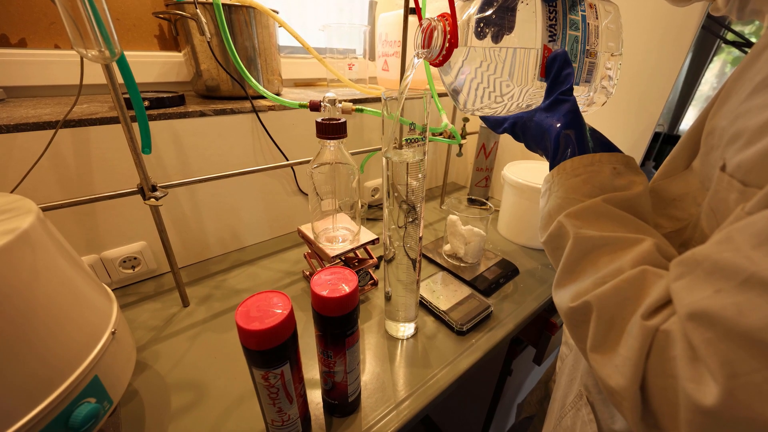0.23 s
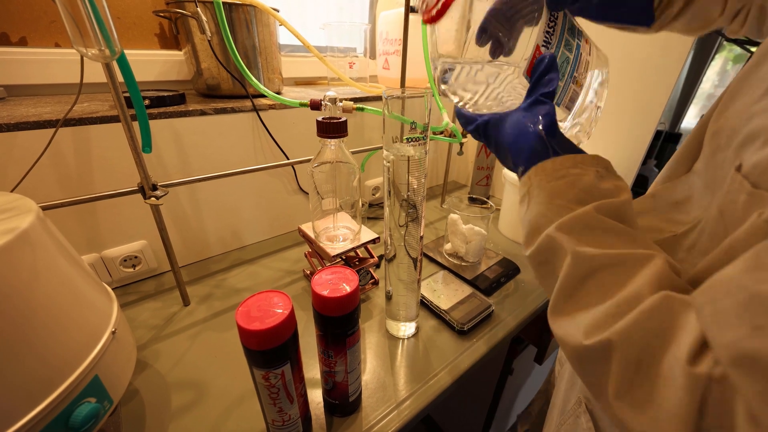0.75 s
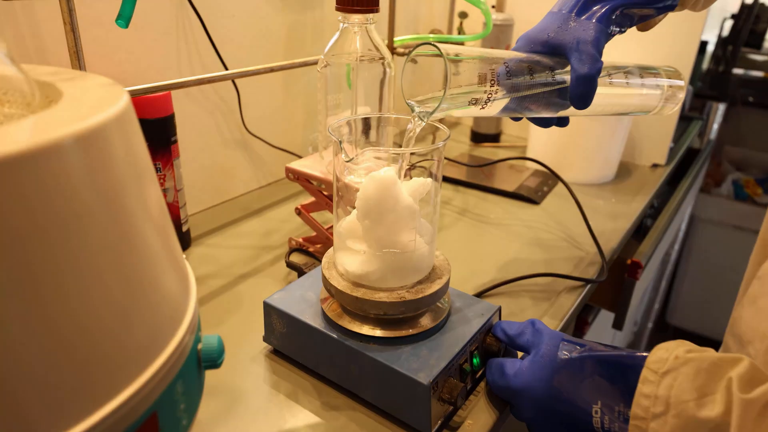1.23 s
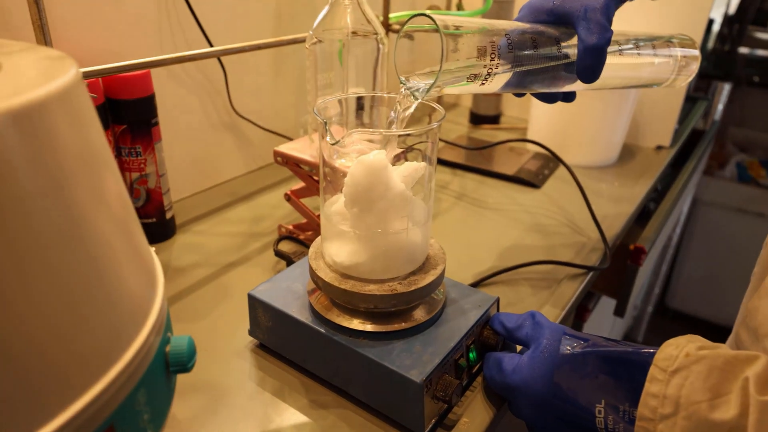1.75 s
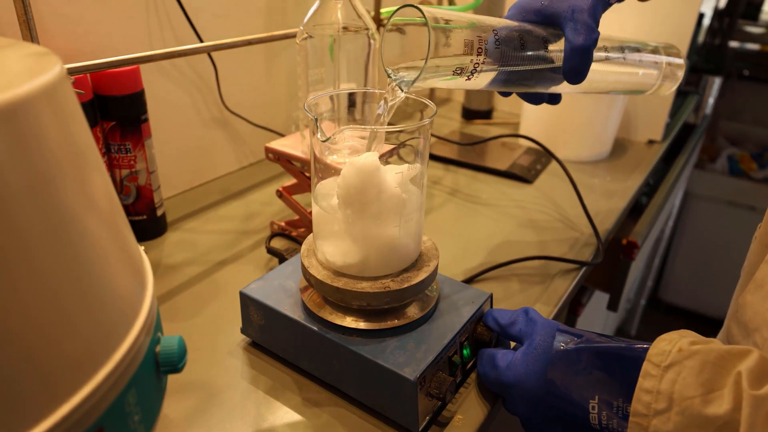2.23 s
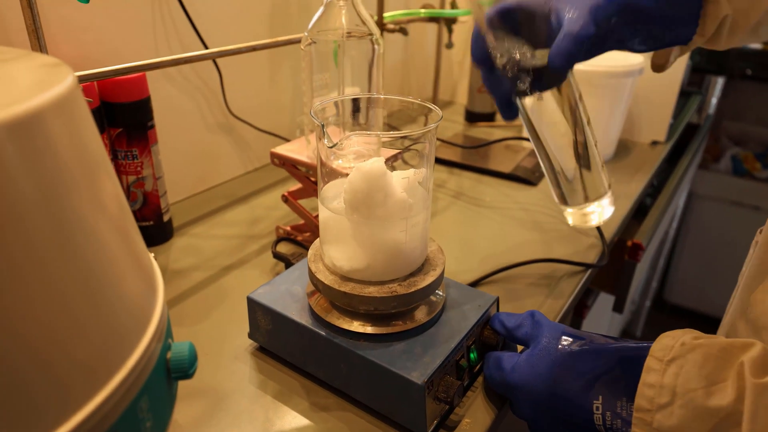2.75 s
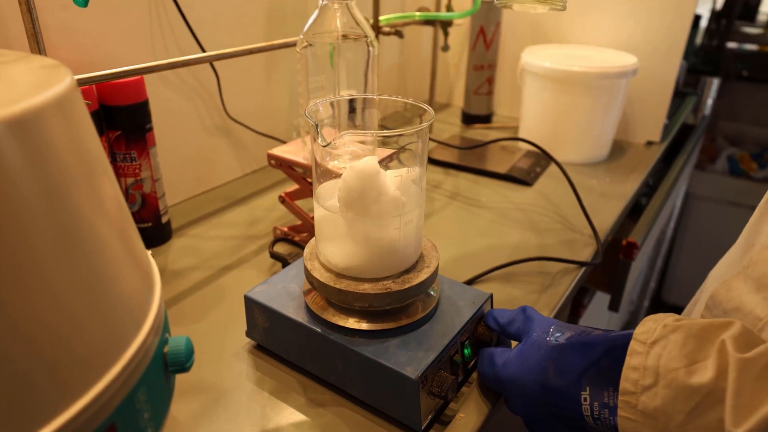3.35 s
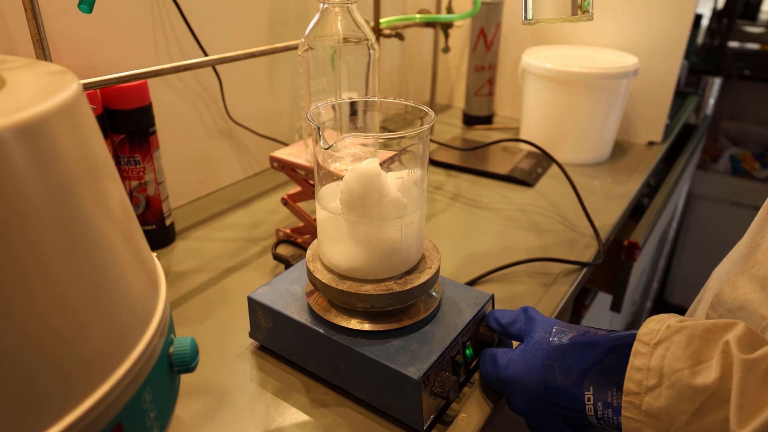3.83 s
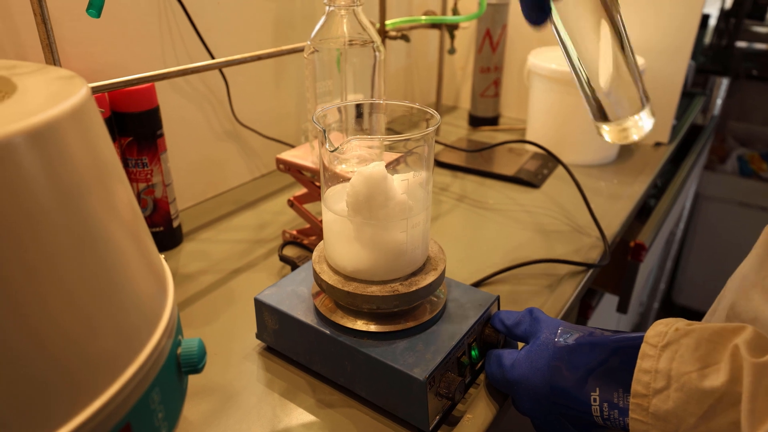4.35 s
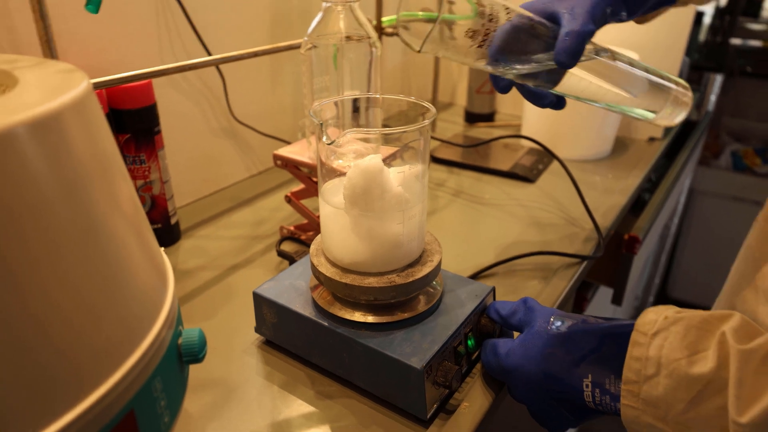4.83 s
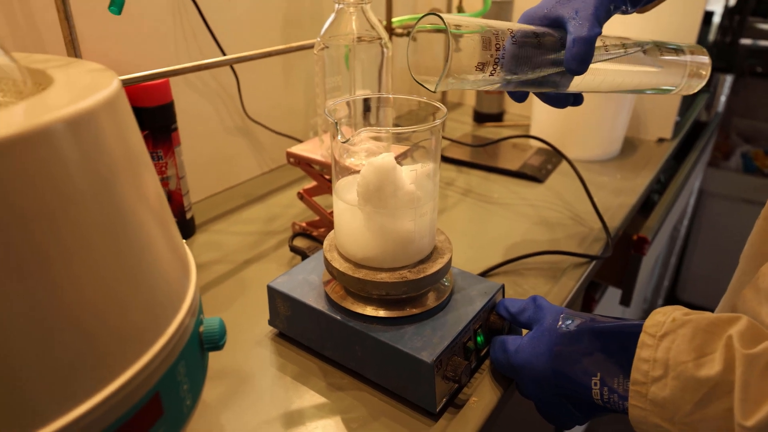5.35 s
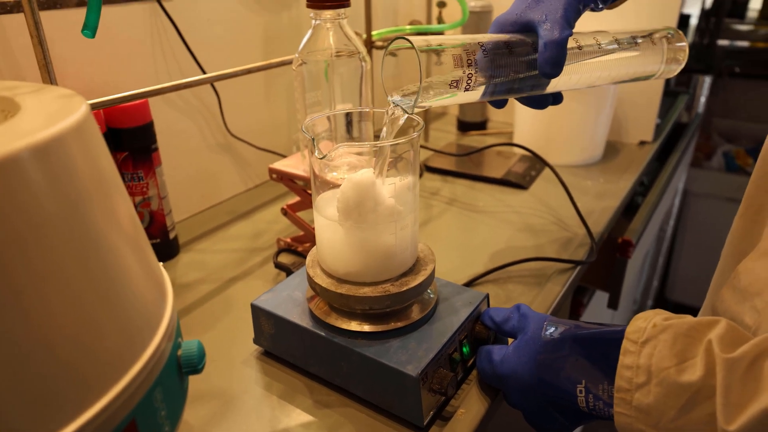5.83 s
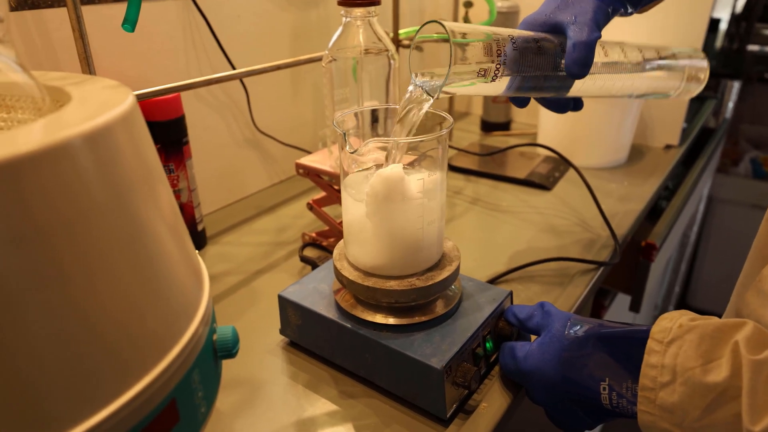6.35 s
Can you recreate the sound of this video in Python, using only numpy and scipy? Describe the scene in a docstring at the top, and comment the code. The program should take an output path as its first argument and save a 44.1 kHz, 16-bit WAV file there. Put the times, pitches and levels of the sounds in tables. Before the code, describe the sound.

Close lab handling: crinkling bottle, gurgling glug, faint trickle, sharp glass clack, wet hollow plop, soft bumps and cloth rustle, then a short splashy pour.

```python
"""Crackling plastic, a last glug, trickling water, glass knocks, a hollow plop and a second splashing pour.
A bottle empties into a tall glass cylinder; the cylinder trickles into a beaker and is set upright, then tipped again.
Large bubbles are shivering sines, the stream a swarm of tiny ones over a wash; snaps, splashes and bumps are noise bursts.
Glass and the air column ring as damped modes; arm, sleeve and room hiss are shaped noise, a faint whistle is sines."""
import sys
import numpy as np
from scipy import signal
from scipy.fft import rfft, irfft, next_fast_len
from scipy.io import wavfile
from scipy.ndimage import map_coordinates

SR = 44100
rng = np.random.default_rng(int(sys.argv[2]) if len(sys.argv) > 2 else 0)


def inscribe(sig):
    """Save sig as 16-bit PCM at rate SR to the path in sys.argv[1].

    A 1-D sig is mono; a 2-D sig holds one channel per row.
    Samples are clipped to [-1, 1] before scaling.
    """
    pcm = np.round(np.clip(np.atleast_2d(sig).T, -1, 1) * 32767)
    wavfile.write(sys.argv[1], SR, pcm.astype(np.int16))


N = 291060  # length in samples

# Movements of the arm. Each row: middle in seconds, length in seconds, dull rumble in relative dB,
# cloth swish in dB before its flutter.
ARM_MOVES = [(0.1, 0.92, -63, -78), (0.95, .32, -61, -56), (1.36, 0.7, -56.5, -62),
             (2.078, 0.28, -54.5, -60), (3.11, 0.42, -79, -67), (3.595, 1, -73.5, -70.5),
             (4.292, 0.084, -72, -67), (4.535, 0.55, -65, -69), (4.936, 0.31, -56.5, -68.5),
             (5.376, 0.36, -53, -65.5), (5.643, 0.45, -46, -64.5), (6.353, 1, -62, -73)]
REST_RUMBLE_DB = -63.5  # rumble between movements, on the scale of the rumble column above
# Tone of the arm's rumble. Each row: frequency in Hz, relative level in dB.
RUMBLE_SPECTRUM = [(20, 7.5), (55, -19.5), (85, 1.5), (120, -4), (200, -10), (300, -16.5), (500, -24),
                   (1000, -60.5), (3000, -87)]
# Tone of the swishing cloth. Each row: frequency in Hz, relative level in dB.
CLOTH_SPECTRUM = [(100, -16), (300, 2.5), (650, 1.5), (900, -2), (1500, -3.5), (2500, -8), (6000, -18.5),
                  (16000, -30)]
# The sleeve sliding over the coat. Each row: time in seconds, level in dB before its flutter.
SLEEVE_SLIDE = [(5.1, -86), (5.3, -63), (5.45, -64.5), (5.56, -54), (5.68, -60.5), (5.78, -65), (5.9, -75),
                (6, -65)]
# Tone of the sliding sleeve. Each row: frequency in Hz, relative level in dB.
SLEEVE_SPECTRUM = [(500, 2), (1500, 3.5), (3500, 1), (6000, -1), (10000, -7.5), (16000, -20.5)]
# Tone of the steady room hiss. Each row: frequency in Hz, relative level in dB.
HISS_SPECTRUM = [(24, 8), (45, -7.5), (100, 17.5), (300, 2), (700, 20), (1200, 8.5), (3000, 10.5),
                 (6000, 9), (16000, 7)]
# How long the room rings. Each row: frequency in Hz, time to fall 60 dB in seconds.
ROOM_DECAY = [(100, 1), (400, 0.25), (1200, 0.35), (4000, 0.35), (12000, 0.32)]
# Loudest snaps of the plastic bottle. Each row: start in seconds, dry peak in dB, centre in Hz,
# time to fall 60 dB in seconds.
BOTTLE_SNAPS = [(0.016, -48, 3970, 0.056), (0.091, -52.5, 3800, 0.088), (0.184, -54.5, 3370, 0.12),
                (0.351, -52, 5360, 0.037), (0.516, -53, 3520, 0.19), (0.546, -53.5, 3380, 0.079),
                (0.718, -44.5, 5670, 0.083), (0.742, -41, 1950, 0.033), (0.755, -40.5, 1800, 0.074),
                (0.775, -44, 4630, 0.058), (0.853, -39, 4930, 0.031), (0.857, -35.5, 3310, 0.049),
                (0.953, -45.5, 3740, 0.051), (0.958, -48, 1700, 0.05), (1.013, -42, 5300, 0.036),
                (1.0337, -39, 4130, 0.062), (1.0345, -40.5, 1480, 0.038), (1.052, -48, 8300, 0.035)]
# The bottle is lifted and crinkles finely. The pair: start in seconds, end in seconds.
CRINKLE_SPAN = (0.73, 0.88)
# Bumps and taps against the bench. Each row: start in seconds, dry peak in dB, centre in Hz,
# time to fall 60 dB in seconds.
BENCH_BUMPS = [(0.545, -51, 165, .17), (1.112, -44, 125, 0.023), (1.934, -53.5, 1020, 0.065),
               (1.966, -41, 540, 0.24), (3.4525, -47.5, 480, 0.046), (4.248, -52, 680, 0.34),
               (4.2485, -45.5, 1165, .1), (4.249, -41.5, 2170, 0.052), (4.301, -44.5, 648, .12),
               (4.873, -48, 970, 0.012), (4.8735, -51, 2810, 0.0086), (5.745, -41, 168, 0.095)]
# Runs of water, each ringing the air space it falls into. Each row: start in seconds, end in seconds,
# flow in relative dB, ring in Hz, ring gain in dB.
WATER_RUNS = [(0.73, 0.88, -65, 3414, 22.5), (1.24, 1.501, -71, 1950, 10), (2.308, 2.501, -71, 2080, 11),
              (2.479, 2.715, -69, 3100, 12.5), (2.781, 2.841, -60, 1700, 1.5),
              (6.019, 6.06, -59.5, 2140, 15.5), (6.149, 6.601, -61, 950, -6),
              (6.27, 6.348, -58.5, 1280, -8)]
SWELL_S, EBB_S = .03, .06  # time constants of a run of water starting and stopping
# Tone of the falling stream. Each row: frequency in Hz, relative level in dB.
STREAM_SPECTRUM = [(200, -2), (600, 9), (1100, 4), (2000, 1.5), (4000, -5.5), (6000, -5.5), (9000, -12.5),
                   (16000, -27)]
# Hollow resonances of the vessel that takes the stream. Each row: centre in Hz, width in Hz, gain in dB.
VESSEL_MODES = [(960, 140, -4), (2076, 110, 2.5), (3250, 680, 1), (4270, 110, -12), (8300, 1800, 10.5)]
# Large air bubbles. Each row: start in seconds, dry peak in dB, starting pitch in Hz,
# time to fall 60 dB in seconds.
LARGE_BUBBLES = [(0.782, -39.5, 962.5, .15), (0.791, -41, 960, 0.049), (0.791, -47.5, 2630, 0.084),
                 (0.812, -29, 844, 0.026), (0.816, -39, 650, 0.091), (0.832, -36.5, 1029, 0.045),
                 (0.833, -38, 541.6, 0.29), (0.84, -38.5, 331, 0.094), (0.858, -33, 882, 0.12),
                 (0.868, -35.5, 549, 0.036), (0.899, -34.5, 836, .06), (0.943, -51.5, 902, 0.38),
                 (1.491, -55, 1110, 0.17), (1.626, -57, 1119, 0.23), (1.98, -50, 763, 0.24),
                 (2.428, -44, 2960, 0.016), (2.754, -40.5, 1253, 0.036), (2.791, -39.5, 1170, 0.04),
                 (2.8239, -23.5, 1189, 0.053), (2.836, -25.5, 1237, 0.052), (2.871, -48.5, 6200, 0.03),
                 (6.172, -37.5, 885, .07), (6.206, -48, 910, 0.034), (6.549, -43, 980, 0.039)]
BUBBLE_RISE_SHARE = 0.027  # a bubble's rise time over its ring time
# Smaller bubbles tumble after the last glug. The pair: start in seconds, end in seconds.
GURGLE_SPAN = (0.81, 1)
# Loudest slaps and sprays of water on glass. Each row: start in seconds, dry peak in dB, centre in Hz,
# time to fall 60 dB in seconds.
WATER_SLAPS = [(0.9, -57, 15100, 0.042), (1.55, -54, 9200, .06), (1.671, -54, 3120, 0.043),
               (1.703, -53.5, 2730, 0.059), (2.35, -51.5, 2940, 0.066), (2.352, -54, 14400, 0.15),
               (2.385, -55, 8700, 0.22), (2.44, -46.5, 7700, 0.064), (2.591, -56.5, 15100, 0.055),
               (2.727, -43, 3200, .05), (2.7532, -36, 3830, .07), (2.755, -38, 1950, 0.16),
               (2.797, -43, 13050, 0.05), (2.822, -37.5, 3970, 0.035), (5.992, -45.5, 6300, 0.08),
               (6.009, -43.5, 3960, 0.26), (6.023, -36, 2900, 0.024), (6.132, -42.5, 4380, 0.1),
               (6.146, -44, 2030, 0.019), (6.192, -50, 4940, 0.27), (6.29, -44, 4400, .1),
               (6.3, -56, 13700, .15), (6.355, -47.5, 8700, .04), (6.415, -49.5, 2570, 0.077),
               (6.506, -49.5, 8300, 0.27), (6.548, -44.5, 1070, 0.12), (6.555, -47, 3330, 0.071)]
# A thin, very high whistle. Each row: time in seconds, guide pitch in Hz, guide level in dB.
WHISTLE_PATH = [(1.2, 11100, -95), (1.25, 12100, -74), (1.305, 13400, -64.5), (1.335, 13500, -64),
                (1.395, 12050, -72), (1.455, 12200, -65), (1.5, 11400, -83)]
# Strands of the whistle around that path. Each row: lead in seconds, pitch ratio, level offset in dB.
WHISTLE_STRANDS = [(0.0031, 0.96, -2), (0.035, 0.98, -6), (0, .77, -9)]
# Glass meets glass. Each row: start in seconds, relative level in dB.
GLASS_CONTACTS = [(2.008, -18.5), (2.0235, -1.5), (2.0281, 3)]
# Modes of the knocked glassware. Each row: frequency in Hz, relative level in dB,
# time to fall 60 dB in seconds.
GLASS_MODES = [(122, -10.5, 1), (441, -19.5, 0.29), (567, -10, 0.1), (779, -6.5, 0.19), (1372, -2.5, 0.21),
               (1466, -7, 0.17), (2000, -19, 0.3), (2160, -8.5, 0.09), (2485, -1.5, 0.094),
               (3100, -10, 0.097), (2940, -23.5, 0.16), (3350, 3.5, 0.029), (4060, -11.5, 0.064),
               (6140, -7, 0.045)]
# Tone of the click and rattle at each contact. Each row: frequency in Hz, relative level in dB.
CLACK_SPECTRUM = [(100, -10), (300, -10), (500, -3.5), (1000, -9.5), (1450, -4.5), (2000, -9), (3600, -7.5),
                  (5000, -20.5), (6200, -13.5), (10000, -21), (16000, -38)]
# The air column above the water. Each row: frequency in Hz, level in dB, time to fall 60 dB in seconds.
COLUMN_MODES = [(415.6, -49, 0.44), (732, -43, 0.18), (1318, -38.5, 0.12), (1616, -46.5, 0.37)]
PLOP_S = 2.826  # the water falls back and closes the air column
TOP_HZ = 15800  # band limit of the camera


def amp(db):
    """Turn decibels into a linear gain."""
    return 10 ** (np.asarray(db) / 20)


def unit(x):
    """Scale a sound to an rms of 1."""
    return x / np.sqrt(np.mean(x ** 2) + 1e-20)


def along(points, hz):
    """Read a curve of (Hz, value) points along a log frequency axis."""
    f, values = np.transpose(points)
    return np.interp(np.log(hz + 1), np.log(f + 1), values)


def curves(rows, outside=None):
    """Draw one curve over the whole scene for each column after the time."""
    times, *columns = np.transpose(rows)
    now = np.arange(N) / SR
    return [np.interp(now, times, column, outside, outside) for column in columns]


def wobble(rate):
    """Drift smoothly through random values, rate knots a second."""
    knots = rng.standard_normal(int(N * rate / SR) + 4)
    return map_coordinates(knots, [np.arange(N) * rate / SR])


def filtered(x, response):
    """Multiply a sound's spectrum by a response of frequency."""
    size = next_fast_len(len(x) + SR // 4)
    spectrum = rfft(x, size) * response(np.fft.rfftfreq(size, 1 / SR))
    return irfft(spectrum, size)[:len(x)]


def coloured(x, db_of, size=4096):
    """Shape a sound by db_of(Hz) with a causal minimum-phase filter, so attacks stay sharp."""
    cepstrum = irfft(np.log(amp(db_of(np.fft.rfftfreq(size, 1 / SR)))))
    # folding the cepstrum forward removes any pre-ring
    cepstrum[1:size // 2] *= 2
    cepstrum[size // 2 + 1:] = 0
    impulse = irfft(np.exp(rfft(cepstrum)))
    return signal.fftconvolve(x, impulse)[:len(x)]


def noise(spectrum):
    """Make steady noise of rms 1 with the given tone."""
    return unit(filtered(rng.standard_normal(N), lambda hz: amp(along(spectrum, hz))))


def fade(t, t60):
    """Decay exponentially, 60 dB in t60 seconds."""
    return np.exp(-np.log(1000) * t / t60)


def add(track, s, x):
    """Mix a sound into the track at s seconds."""
    part = track[max(round(s * SR), 0):][:len(x)]
    part += x[:len(part)]


def resonances(modes, f):
    """Sum the complex band-pass responses of (Hz, width, dB) modes."""
    return sum(amp(db) * 1j * f * width / (centre * centre - f * f + 1j * f * width)
               for centre, width, db in modes)


def ripple(hz, spacing_hz):
    """Scatter random peaks and dips over frequency, in units of their spread."""
    return map_coordinates(rng.standard_normal(400), [hz / spacing_hz], mode="nearest")


def ringing(modes, attack):
    """Set damped (Hz, dB, t60) modes going with one push."""
    t = np.arange(SR * 3 // 4) / SR
    ring = sum(amp(db) * fade(t, t60) * np.sin(2 * np.pi * hz * t) for hz, db, t60 in modes)
    return (1 - np.exp(-t / attack)) * ring


def scatter(span, count, level_db, spread_db, centre_hz, spread_octaves, t60):
    """Strew small random events over a span, as rows of start, peak dB, centre Hz and t60."""
    times = np.linspace(*span, count)
    step = times[1] - times[0]
    rows = []
    for s, (late, size, pitch) in zip(times, rng.uniform(-1, 1, (count, 3))):
        hz = centre_hz * 2 ** (spread_octaves * pitch)
        rows.append((s + step * late / 2, level_db + spread_db * size, hz, t60))
    return rows


def in_room(x, wet_db, delay=0.0067):
    """Add the room's answer after a short delay: a noise tail whose bass rings longest."""
    hz, t, grid = signal.stft(rng.standard_normal(SR // 3), SR, nperseg=256)
    decay = fade(t, along(ROOM_DECAY, hz)[:, None])
    tail = signal.istft(grid * decay, SR, nperseg=256)[1]
    wet = signal.fftconvolve(x, np.pad(tail, (round(delay * SR), 0)))[:len(x)]
    return x + amp(wet_db) * np.std(x) * unit(wet)


def room_hiss():
    """A steady bed of shaped noise under the whole scene."""
    return amp(-72) * noise(HISS_SPECTRUM)


def swell(middle, length):
    """Gain of one arm movement: a bell curve that speeds up and slows down smoothly."""
    return np.exp(-(2 * (np.arange(N) / SR - middle) / length) ** 2)


def arm(rumble_db=-1, flutter_db=1.5, jolt_db=3.0):
    """The moving arm rumbles dully and its sleeve swishes, catching unevenly."""
    speeds = np.array([swell(middle, length) for middle, length, _, _ in ARM_MOVES])
    rumble, swish = amp(np.transpose(ARM_MOVES)[2:]) @ speeds
    slide, = curves(SLEEVE_SLIDE, outside=-120)
    cloth = swish * noise(CLOTH_SPECTRUM) + amp(slide) * noise(SLEEVE_SPECTRUM)
    jolts = amp(rumble_db + jolt_db * wobble(14))
    thud = (rumble + amp(REST_RUMBLE_DB)) * jolts * noise(RUMBLE_SPECTRUM)
    return thud + cloth * amp(flutter_db * wobble(45))


def bursts(rows, peak_db, skirt_db, ripple_db, rise, wet_db, grit=0.27):
    """Short gritty noise bursts, strongest at their centre, skirt_db weaker per log2(1 + octaves squared)."""
    out, t = np.zeros(N), np.arange(SR // 3) / SR
    for s, db, centre, t60 in rows:
        clumps = np.exp(grit * np.interp(t, np.linspace(0, t[-1], 256), rng.standard_normal(256)))
        burst = rng.standard_normal(len(t)) * clumps * fade(t, t60) * (1 - np.exp(-t / rise))

        def tone(hz):
            """A narrow peak on broad skirts, with random resonances of its own."""
            octaves = np.log2((hz + 20) / centre)
            peak = peak_db / (1 + (octaves / 0.13) ** 2)
            skirt = skirt_db * np.log2(1 + octaves ** 2)
            return peak - skirt + ripple_db * ripple(hz, spacing_hz=220.0)

        burst = coloured(burst, tone)
        add(out, s, amp(db) * in_room(burst / abs(burst).max(), wet_db))
    return out


def bottle():
    """The thin plastic snaps with a very quick attack, and crinkles finely as it is lifted."""
    crinkle = scatter(CRINKLE_SPAN, count=18, level_db=-56, spread_db=-4, centre_hz=3800,
                      spread_octaves=1.4, t60=0.0086)
    return bursts(BOTTLE_SNAPS + crinkle, peak_db=12, skirt_db=9, ripple_db=2.5, rise=0.00015, wet_db=-5.5)


def bench():
    """Bumps and taps excite uneven, mostly low resonances against the bench."""
    return bursts(BENCH_BUMPS, peak_db=8.5, skirt_db=8.5, ripple_db=5.5, rise=0.00045, wet_db=-8)


def gush(start, end):
    """Gain of one run of water: it swells, holds and ebbs exponentially."""
    t = np.arange(N) / SR
    return np.exp(np.minimum(t - start, 0) / SWELL_S - np.maximum(t - end, 0) / EBB_S)


def stream(count=4500, life=0.04, spread_db=5.0, grain_db=-4, wash_db=-6.0, crowding=.6, surge_db=2.5):
    """The stream traps tiny rising bubbles, more as it swells, over a soft wash; the vessel colours both."""
    flow = sum(amp(db) * gush(start, end) for start, end, db, _, _ in WATER_RUNS)
    flow_db = 20 * np.log10(flow + 1e-9) + surge_db * wobble(20)
    density = amp(crowding * flow_db)
    draw, t = rng.random((count, 3)), np.arange(SR // 40) / SR
    # strong flow draws more of the start times
    start = np.searchsorted(np.cumsum(density), draw[:, :1] * density.sum()).clip(0, N - 1)
    hz = 1000 * (13000 / 1000) ** draw[:, 1:2]  # 1 to 13 kHz
    size_db = -spread_db * np.log(np.maximum(draw[:, 2:], .03)) + flow_db[start]
    # crowded bubbles are each made quieter
    size = amp(size_db) / np.sqrt(density[start]) * hz ** 0.31
    age = t / life * np.sqrt(hz / 3000)  # small bubbles die sooner
    tones = np.sin(2 * np.pi * hz * t * (1 + 0.01 * age))
    grains = size * tones * fade(age, 0.72) * np.minimum(age / 0.06, 1)

    def colour(f):
        return amp(along(STREAM_SPECTRUM, f)) * (1 + resonances(VESSEL_MODES, f))

    swarm = np.bincount((start + np.arange(len(t))).ravel(), grains.ravel(), N)[:N]
    swarm = in_room(filtered(swarm, lambda f: colour(f) * np.sqrt(f)), wet_db=-9.0)
    wash = amp(flow_db) * unit(filtered(rng.standard_normal(N), colour))
    return amp(grain_db) * np.std(wash) * unit(swarm) + amp(wash_db) * wash


def air_space(water, width_hz=60):
    """Each run of water rings one hollow note in the vessel."""
    out = np.zeros(N)
    for start, end, _, hz, db in WATER_RUNS:
        out += filtered(water * gush(start, end), lambda f: resonances([(hz, width_hz, db)], f))
    return out


def bubbles(climb=.4, shiver=0.016, shiver_rate=250):
    """Each bubble rings at its own pitch, which shivers with its shape and climbs as it nears the surface."""
    # climb: share of the pitch per second; shiver: share of the pitch; shiver_rate: knots a second
    out, t = np.zeros(N), np.arange(SR // 3) / SR
    gurgle = scatter(GURGLE_SPAN, count=12, level_db=-42.5, spread_db=-3, centre_hz=480,
                     spread_octaves=0.89, t60=0.028)
    for s, db, hz, t60 in LARGE_BUBBLES + gurgle:
        swing = (1 - np.exp(-(t / (BUBBLE_RISE_SHARE * t60)) ** 2)) * fade(t, t60)
        shape = np.interp(t * shiver_rate, np.arange(400), rng.standard_normal(400))
        pitch = hz * (1 + climb * t + shiver * shape)
        ring = swing / swing.max() * np.sin(2 * np.pi * np.cumsum(pitch) / SR)
        add(out, s, amp(db) * in_room(ring, wet_db=-3.0))
    return out


def splashes():
    """Slaps and sprays of water on glass burst as strongly peaked noise."""
    return bursts(WATER_SLAPS, peak_db=17.5, skirt_db=8, ripple_db=3.5, rise=0.00039, wet_db=-3.5)


def whistle(waver_hz=50):
    """A faint whistle arches up and falls back in several thin, wavering strands."""
    out = np.zeros(N)
    hz, db = curves(WHISTLE_PATH, outside=0)
    for lead, ratio, strand_db in WHISTLE_STRANDS:
        pitch = ratio * hz + waver_hz * wobble(190)
        level = amp(db + strand_db) * (hz > 0)  # silent outside the path
        tone = level * np.sin(2 * np.pi * np.cumsum(pitch) / SR)
        out += np.roll(tone, -round(lead * SR))
    return out


def knocks(ring_db=-35, clack_db=-17):
    """Each glass contact is a sharp click with a dense rattle, plus the damped ring of the glassware."""
    out, ring = np.zeros(N), ringing(GLASS_MODES, attack=0.00055)
    t = np.arange(len(ring)) / SR
    for s, db in GLASS_CONTACTS:
        rattle = .08 * rng.standard_normal(len(t)) * fade(t, .04)
        contact = (t == 0) + rattle
        clack = coloured(contact, lambda hz: along(CLACK_SPECTRUM, hz))
        clack = in_room(clack / abs(clack).max(), wet_db=-4.0)
        add(out, s, amp(db) * (amp(ring_db) * ring + amp(clack_db) * clack))
    return out


def air_column():
    """The plop rings the air that stands above the water in the upright cylinder."""
    out = np.zeros(N)
    add(out, PLOP_S, ringing(COLUMN_MODES, attack=0.0013))
    return out


def scene():
    """Water, bottle, glassware and arm over the steady hiss of the room."""
    pour = stream()
    water = pour + air_space(pour) + bubbles() + splashes() + air_column()
    handling = arm() + bottle() + bench() + knocks()
    return (water + handling + whistle() + room_hiss())[None]


def record(dry, notch_hz=7060, notch_width_hz=370, notch_db=36, low_hz=72):
    """The camera cuts the deep bass, notches out a band near 7 kHz and keeps nothing above its band limit."""
    def tone(hz):
        notch = -notch_db * np.exp(-((hz - notch_hz) / notch_width_hz) ** 2)
        low_cut = -19 / (1 + (hz / low_hz) ** 22)  # a steep step down of 19 dB
        return notch + low_cut

    return filtered(coloured(dry[0], tone), lambda hz: hz < TOP_HZ)[None]


dry = scene()
out = record(dry)
inscribe(out)
```